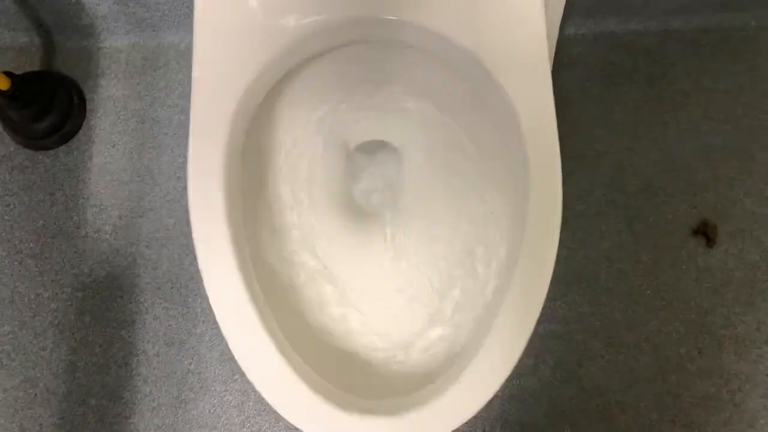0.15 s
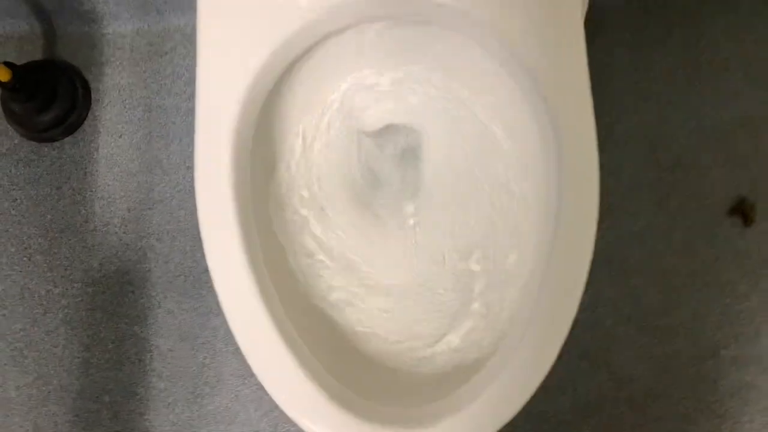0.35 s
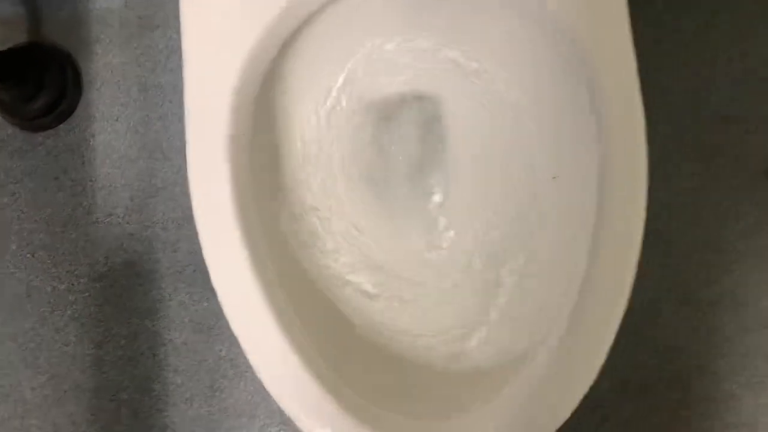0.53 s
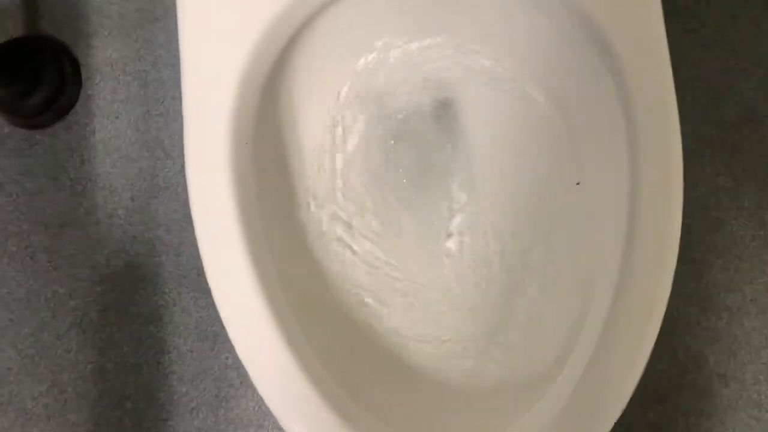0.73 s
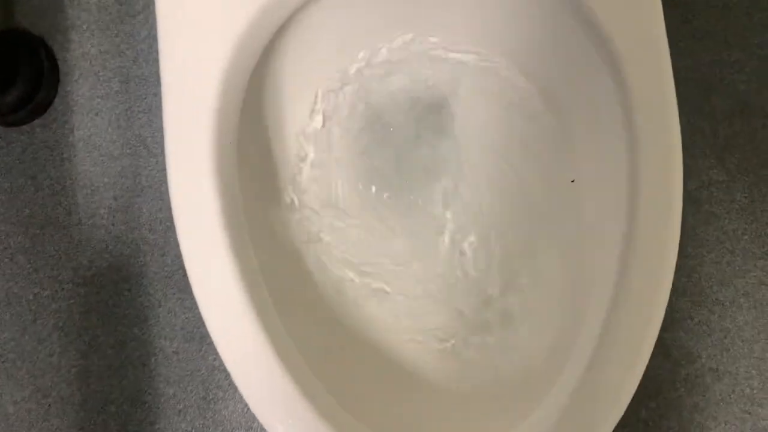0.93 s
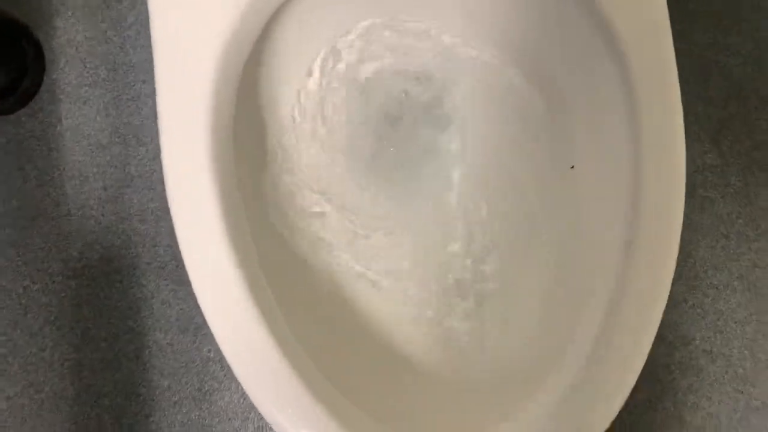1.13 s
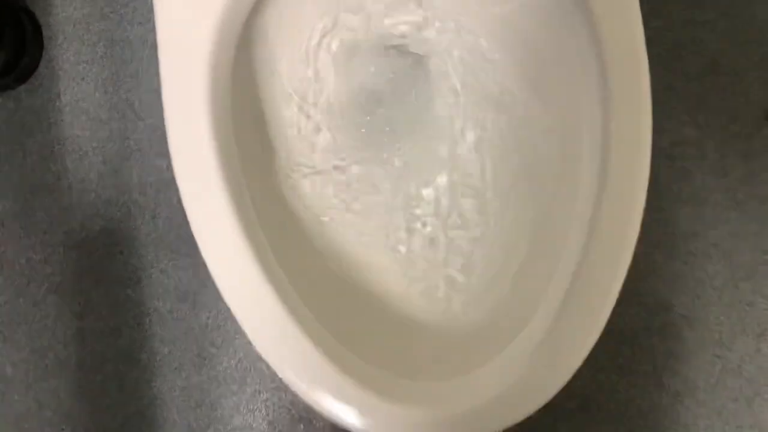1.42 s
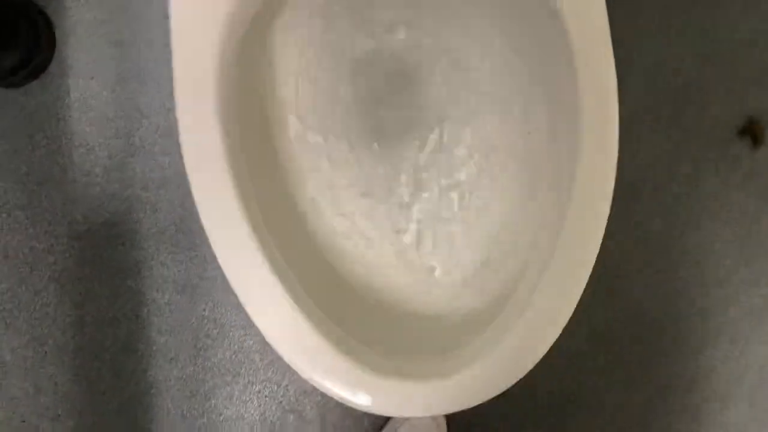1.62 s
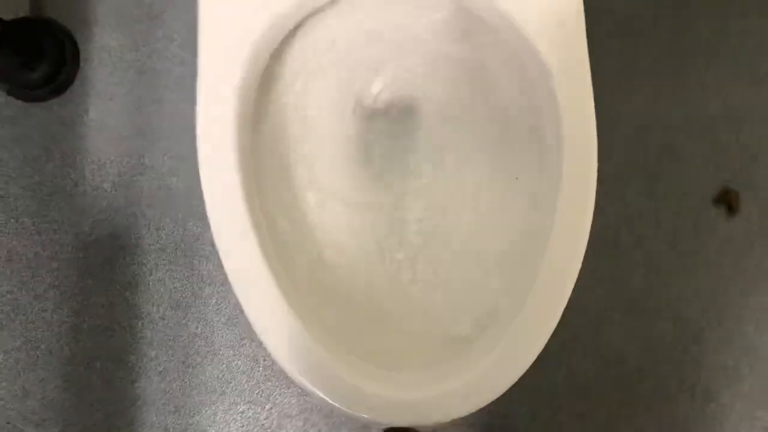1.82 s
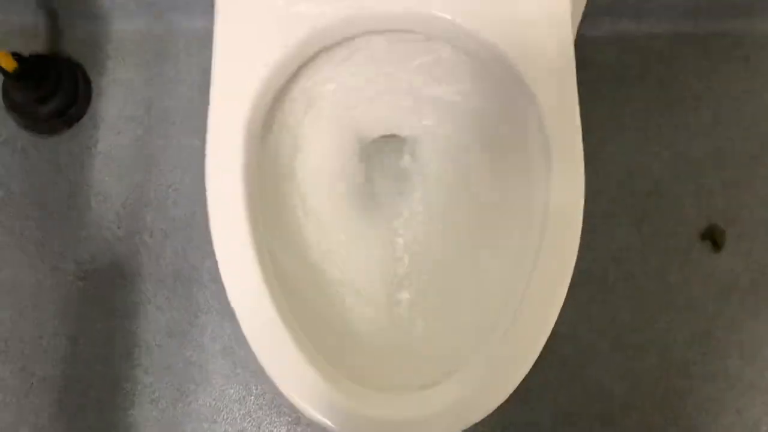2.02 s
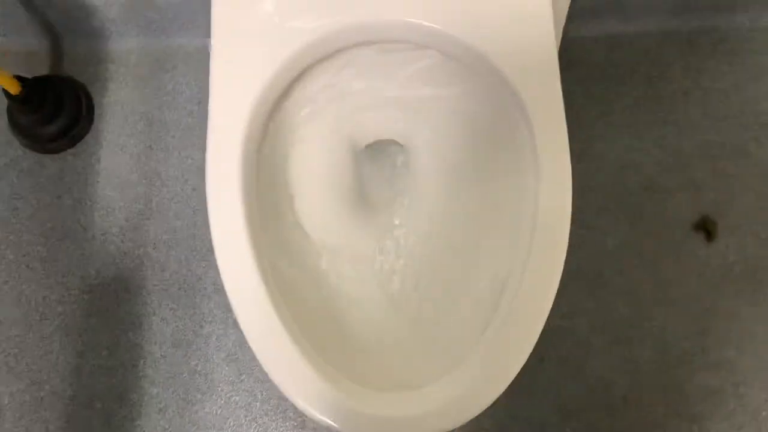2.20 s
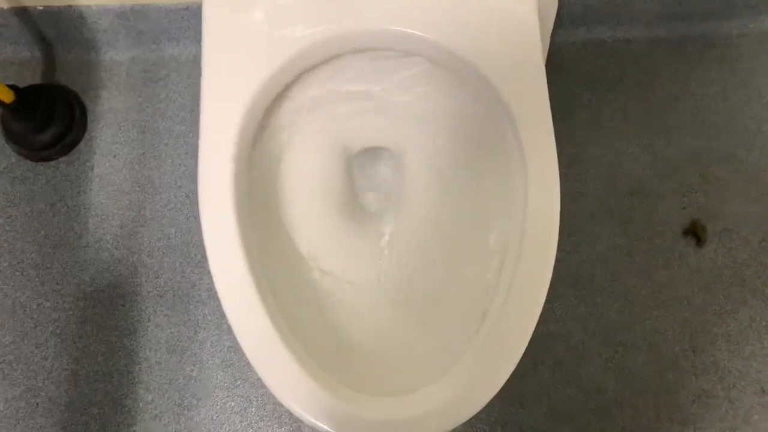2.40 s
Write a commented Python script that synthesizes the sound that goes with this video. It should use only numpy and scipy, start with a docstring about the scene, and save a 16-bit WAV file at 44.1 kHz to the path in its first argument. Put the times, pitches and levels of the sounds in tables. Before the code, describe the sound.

A toilet flushes in a small tiled room, close above the bowl: gurgling bubbles fade into thin valve hiss, two sharp plastic clacks with handling rumble, then louder glugging with swelling water and spray.

```python
"""A toilet flushes in a small tiled room, heard from a hand-held two-port microphone above the bowl.
First air gurgles through the trap as swarming bubbles and single glugs, over noise beds of rim water and spray.
A valve hiss, noise with faint whistling bands, comes in as the gurgle dies away. In the lull fall two sharp
plastic clacks, cracks with ringing parts, probably the flush lever or valve; the hand rumbles on the microphone.
Then the gurgle returns louder, with water and spray swelling to the end."""
import sys
import numpy as np
from scipy import signal
from scipy.fft import rfft, irfft
from scipy.io import wavfile
from scipy.ndimage import uniform_filter1d

SR = 44100
rng = np.random.default_rng(int(sys.argv[2]) if len(sys.argv) > 2 else 0)


def level_to_linear(level):
    """Convert decibel levels to linear amplitude factors, elementwise."""
    exponent = np.asarray(level, float) / 20
    return 10 ** exponent


def bounce(signal):
    """Save signal as a 16-bit WAV file at the path given by the first command-line argument."""
    frames = np.transpose(np.atleast_2d(signal))
    limited = np.clip(frames, -1, 1)
    pcm = np.round(limited * 32767).astype(np.int16)
    wavfile.write(sys.argv[1], SR, pcm)


N = 112454   # samples


def rms_one(x):
    """Scale to rms 1."""
    return x / np.sqrt(np.mean(x ** 2) + 1e-20)


def in_time(rows):
    """Gain at every sample from (t/s, level/dB) rows."""
    return level_to_linear(np.interp(np.arange(N) / SR, *np.transpose(rows)))


def at_hz(points, hz):
    """Read a table on a log-frequency axis."""
    table_hz, values = np.transpose(points)
    return np.interp(np.log(np.maximum(hz, 1)), np.log(table_hz), values)


def coloured(x, colour):
    """Filter by an (f/Hz, level/dB) table."""
    hz = np.arange(N // 2 + 1) * SR / N
    return irfft(rfft(x) * level_to_linear(at_hz(colour, hz)), N)


def drift(rate_hz):
    """Slow random wander of rms 1: noise through a two-pole low-pass, drawn every 40 samples."""
    pole = np.exp(-2 * np.pi * rate_hz * 40 / SR)
    noise = rng.standard_normal(N // 40 + 2002)
    slow = signal.lfilter([1], [1, -2 * pole, pole * pole], noise)[2000:]   # skip the run-in
    return np.interp(np.arange(N) / 40, np.arange(len(slow)), rms_one(slow))


# How alike left and right are in the noise beds: f/Hz, correlation (-1 to 1)
LEFT_RIGHT_LIKENESS = [(60, 0.86), (290, 0.93), (640, -0.064), (1410, -0.063), (3100, 0.064), (5400, -0.16),
                       (6500, 0.38)]


def wash(colour, patchy_db, source=None, peaks=()):
    """Stereo noise in half-octave bands, each flickering on its own and together; rms 1."""
    hz = np.arange(N // 2 + 1) * SR / N
    alike = np.clip(at_hz(LEFT_RIGHT_LIKENESS, hz), -1, 1)
    mid, side = rfft(rng.standard_normal((2, N)) if source is None else source)
    stereo = np.sqrt(1 + alike) * mid + np.sqrt(1 - alike) * side * [[1], [-1]]
    inside = (hz > colour[0][0]) & (hz < colour[-1][0])
    db = at_hz(colour, hz)
    for centre_hz, width_hz, change_db in peaks:
        db = db + change_db * np.exp(-((hz - centre_hz) / width_hz) ** 2)
    spectrum = level_to_linear(db) * inside * stereo
    out, together = 0, drift(34.0)
    place = 2 * np.log2(np.maximum(hz, 1))   # half-octaves above 1 Hz
    for k in range(int(place[inside][0]), int(place[inside][-1]) + 2):
        band = irfft(spectrum * np.clip(1 - abs(place - k), 0, 1), N)
        out = out + band * level_to_linear(patchy_db * (0.25 * together + drift(42.0)))
    return rms_one(out)


GLUG_RISE = 0.0067   # pitch rise per cycle, as a share of the pitch


def bubbles(s, db, hz, cycles):
    """Each air pocket swells to its peak over some cycles, rings at a rising pitch and dies."""
    t = np.arange(1400) / SR
    turns = np.asarray(hz)[:, None] * t
    swell = (turns / cycles * np.exp(1 - turns / cycles)) ** 2
    ring = np.sin(2 * np.pi * turns * (1 + GLUG_RISE * (turns / 2 - cycles)))   # named pitch at the peak
    places = (np.asarray(s)[:, None] * SR).astype(int) + np.arange(len(t))
    out = np.zeros(N + len(t))
    np.add.at(out, places, swell * ring * level_to_linear(np.asarray(db))[:, None])
    return out[:N]


# Bubble swarm in the trap: t/s, level/dB, brightness/(dB per octave)
SWARM = [(0, -26.5, 2), (.24, -26.5, -2), (.42, -30, -3.5), (.5, -34, -5.5), (.65, -38, -7), (.96, -44, -7),
         (1.1, -53, -19), (1.25, -43, -27), (1.6, -37, 4), (1.69, -29.5, 1.5), (1.8, -27, 2.5),
         (1.9, -19.5, 0.5), (1.94, -25, 4.5), (2.0, -18.5, 0), (2.13, -20, 4), (2.179, -22, 4),
         (2.27, -18.5, 1), (2.4, -21, 3.5), (2.55, -20, -1.5)]
# Resonances of bowl and trap: f/Hz, level/(dB per Hz)
BOWL_RESONANCES = [(200, -3.5), (275, -3.5), (356, 1.5), (470, -0.5), (600, 2), (720, 5.5), (850, -5),
                   (980, -8), (1130, -3), (1330, -12), (1500, -13), (1700, -22), (3000, -35), (6600, -120)]
BUBBLES_PER_S, BUBBLE_SPREAD_DB = 1300, 2
BUBBLE_MID_HZ, BUBBLE_MID_CYCLES = 603, 3.27   # cycles to the peak at the middle pitch


def bubble_swarm():
    """A dense crowd of random bubbles ringing through the bowl's resonances."""
    start, pitch, luck = rng.random((int(BUBBLES_PER_S * N / SR), 3)).T
    s, hz = start * N / SR, 270 * 10.57 ** pitch
    at, level_db, brightness = np.transpose(SWARM)
    db = np.interp(s, at, brightness) * np.log2(hz / BUBBLE_MID_HZ) + 25 * np.log10(hz)
    db = db - BUBBLE_SPREAD_DB * np.log(luck + 0.019)
    cycles = BUBBLE_MID_CYCLES * (hz / BUBBLE_MID_HZ) ** 0.41
    swarm = bubbles(s, db, hz, cycles[:, None]) * level_to_linear(drift(32.0))   # trembles by 1 dB
    swarm = coloured(swarm, BOWL_RESONANCES)
    swarm = swarm / np.sqrt(uniform_filter1d(swarm ** 2, size=6000) + 1e-20)   # even out before the level curve
    return in_time(np.transpose([at, level_db])) * swarm


# Loudest single glugs: t/s, peak level/dB before GLUG_LIFT_DB, f/Hz
LOUD_GLUGS = [(0.054, -12.5, 705), (0.069, -16.5, 630), (0.092, -23, 690), (0.19, -15, 680),
              (0.193, -20, 361), (0.229, -20, 766), (0.267, -11.5, 703), (0.331, -17.5, 664),
              (0.352, -29, 610), (0.367, -15, 620), (0.381, -12.5, 643), (0.524, -17, 710),
              (0.559, -16, 650), (0.606, -25, 406), (1.621, -18.5, 636), (1.638, -18.5, 590),
              (1.689, -16, 626), (1.699, -12.5, 640), (1.706, -10, 664), (1.721, -11, 682),
              (1.761, -13, 640), (1.799, -12, 638), (1.821, -9, 770), (1.847, -3.5, 702),
              (1.861, -5.5, 690), (1.885, -10, 663), (1.899, -15.5, 466), (1.919, -12, 762),
              (1.954, -3.5, 684), (1.978, -8, 720), (1.988, -7, 797), (2.008, -5.5, 766), (2.035, -7, 636),
              (2.049, -16, 602), (2.091, -10.5, 653), (2.105, -9, 747), (2.133, -7.5, 610),
              (2.229, -11, 628), (2.2345, -9.5, 458), (2.324, -4.5, 686), (2.354, -3.5, 730),
              (2.462, -13, 690)]
# Glugs ring longest while the trap refills: t/s, cycles to the peak
GLUG_LENGTHS = [(.4, 1.72), (1.7, 2.26), (2.0, 2.76), (2.1, 1.46)]
# Loud small bubbles: t/s, peak level/dB, f/Hz
SMALL_BLIPS = [(0.215, -25, 1156), (0.261, -19, 1166), (1.571, -25, 1270), (1.625, -24.5, 2230),
               (1.809, -27, 1270), (1.91, -11, 1144), (1.957, -11.5, 1180), (2.279, -16, 1093),
               (2.335, -16, 1470), (2.343, -19, 2360)]
GLUG_LIFT_DB, BLIP_CYCLES = 0.5, 4.6   # blip cycles to the peak


def gurgle():
    """Air forced through the trap: the bubble swarm under loud single glugs and blips."""
    s, db, hz = np.transpose(LOUD_GLUGS)
    cycles = np.interp(s, *np.transpose(GLUG_LENGTHS))
    glugs = bubbles(s, db + GLUG_LIFT_DB, hz, cycles[:, None])
    blips = bubbles(*np.transpose(SMALL_BLIPS), BLIP_CYCLES)
    return bubble_swarm() + glugs + blips


# Blows, the last two close enough to fuse: t/s, level/dB before a trim, lowest f/Hz, brightness/(dB per octave)
BLOWS = [(1.115, 0.5, 920, -0.5), (1.2302, -6, 400, -0.5), (1.2339, -6.5, 286, -1.5)]
# Ringing plastic parts: f/Hz, level/dB before random spread, t60/s
PLASTIC_MODES = [(351, -8.5, 0.073), (517, -12.5, 0.037), (1470, -10.5, 0.018), (2090, -8.5, 0.035),
                 (2370, -11, 0.02), (2740, -9.5, 0.014), (3720, -7.5, 0.017), (4000, -10, 0.015),
                 (10220, -5, 0.018)]
# Spectrum of the crack before each blow's brightness: f/Hz, level/(dB per Hz)
CRACK_SPECTRUM = [(700, -4), (1400, -3), (2300, 3), (3250, -9), (3900, -3.5), (6000, -3), (7700, 2.5),
                  (9000, -6), (10600, 3), (14500, 3.5), (17000, -24)]
CRACK_T60_S, CRACK_DB = 0.029, 2.5


def clacks():
    """Each blow is a short noise crack plus the ringing of the plastic parts."""
    t, out = np.arange(N) / SR, np.zeros(N)
    for s, db, low_hz, brightness in BLOWS:
        age = np.maximum(t - s, 0)
        colour = [(hz, level + brightness * np.log2(hz / 1000)) for hz, level in CRACK_SPECTRUM]
        crack = rms_one(coloured(rng.standard_normal(N), colour))
        hit = crack * (t > s) * level_to_linear(CRACK_DB - 60 * age / CRACK_T60_S)
        spread_db = rng.normal(0, 1.44, len(PLASTIC_MODES))
        for (hz, mode_db, t60), luck in zip(PLASTIC_MODES, spread_db):
            hit += np.sin(2 * np.pi * hz * age) * level_to_linear(mode_db + luck - 60 * age / t60)
        high_pass = signal.butter(2, low_hz, "high", fs=SR, output="sos")
        out += level_to_linear(db - 8.5) * signal.sosfilt(high_pass, hit)
    return out


# Water round the rim: t/s, level/dB before RUSH_LIFT_DB
RUSH_LEVEL = [(0.0, -43), (0.2, -42.5), (0.32, -46.5), (0.55, -44), (0.94, -50), (1.16, -45.5),
              (1.28, -35.5), (1.62, -38.5), (2.14, -38.5), (2.55, -30)]
# Its spectrum: f/Hz, level/(dB per Hz)
RUSH_SPECTRUM = [(88, -17), (150, -6.5), (242, -26), (296, -8.5), (415, 3.5), (490, -19), (770, -2.5),
                 (7000, -15.5), (13200, -120)]
RUSH_LIFT_DB = 6


def rush():
    """Turbulent rim water: patchy noise following a level curve."""
    return level_to_linear(RUSH_LIFT_DB) * in_time(RUSH_LEVEL) * wash(RUSH_SPECTRUM, patchy_db=2.0)


# Valve hiss: t/s, level/dB
HISS_LEVEL = [(0, -55), (.32, -70), (.345, -34.5), (.75, -33), (.94, -33.5), (.97, -37.5), (1.2, -32.5),
              (1.45, -38), (2.55, -50)]
# Its spectrum: f/Hz, level/(dB per Hz)
HISS_SPECTRUM = [(2200, -12.5), (2800, -5), (4000, -2), (6000, -4), (8000, -0.5), (10000, -6.5),
                 (13000, -5), (15800, -5)]
# Faint whistles of the valve: f/Hz, width/Hz, level over the hiss/dB
VALVE_WHISTLES = [(4500, 80, 5), (4930, 80, 5), (6860, 90, 8), (10750, 100, 4)]


def valve_hiss():
    """Water squeezed through the valve: nearly even noise with narrow whistling bands."""
    return in_time(HISS_LEVEL) * wash(HISS_SPECTRUM, patchy_db=0.5, peaks=VALVE_WHISTLES)


# Fine spray: t/s, level/dB
SPRAY_LEVEL = [(0, -38), (.155, -40), (.165, -34.5), (.23, -43.5), (.33, -42.5), (.5, -39), (1.3, -44),
               (1.5, -30.5), (1.85, -28.5), (2.3, -32), (2.45, -27.5), (2.55, -24)]
# Its spectrum: f/Hz, level/(dB per Hz)
SPRAY_SPECTRUM = [(2500, -2.5), (4000, 1), (5500, -4.5), (7500, 3), (10000, 5.5), (13000, 4.5), (15500, 5),
                  (16500, -28)]
# Single droplet ticks: t/s, level/dB of the burst before its band-pass, f/Hz
DROPLET_TICKS = [(0.162, -17.5, 8900), (1.839, -12.5, 8900), (2.203, -16, 11900)]
DROPS_PER_S, DROP_SPREAD_DB, TICK_T60_S = 6000, 2, 0.042


def spray():
    """Thousands of tiny droplets bursting as random impulses, and a few single ticks of banded noise."""
    sizes = level_to_linear(DROP_SPREAD_DB * np.minimum(rng.exponential(1, (2, N)), 5))
    signs = rng.choice([-1, 1], (2, N))
    drops = sizes * signs * (rng.random((2, N)) < DROPS_PER_S / SR)
    fizz = in_time(SPRAY_LEVEL) * wash(SPRAY_SPECTRUM, patchy_db=1.5, source=drops)
    t = np.arange(N) / SR
    for s, db, hz in DROPLET_TICKS:
        decay = level_to_linear(db - 60 * np.maximum(t - s, 0) / TICK_T60_S)
        burst = rng.standard_normal(N) * (t > s) * decay
        band = signal.butter(2, [hz / 1.16, hz * 1.13], "band", fs=SR, output="sos")
        fizz = fizz + signal.sosfilt(band, burst)
    return fizz


# Hand rumble: t/s, level/dB
RUMBLE_LEVEL = [(0, -47), (.64, -54.5), (1.04, -50), (1.2, -39), (1.3, -35), (1.55, -46), (1.62, -47),
                (2.3, -50.5), (2.55, -49)]
# Its spectrum: f/Hz, level/(dB per Hz)
RUMBLE_SPECTRUM = [(13, -40), (22, -8), (70, 1.5), (130, -0.5), (178, -10.5), (220, -4), (290, -55),
                   (480, -120)]
# One low hum near 217 Hz and two slight dips: f/Hz, width/Hz, level against the rumble/dB
HUM_AND_DIPS = [(70, 18, -1), (130, 11, -1), (217, 8.4, 8.5)]


def hand_rumble():
    """The hand on the microphone: patchy low noise with one narrow hum."""
    return in_time(RUMBLE_LEVEL) * wash(RUMBLE_SPECTRUM, patchy_db=2.0, peaks=HUM_AND_DIPS)


# Air murmuring in the trap: f/Hz, level/(dB per Hz)
MURMUR_SPECTRUM = [(310, -28), (356, 9), (450, -27)]
MURMUR_DB, MURMUR_FOLLOWS = -21.5, 0.57   # offset added to this share of the rumble's dB curve


def trap_murmur():
    """Air in the trap, shaken up with the rumble: a narrow noise band following part of its swing."""
    gain = level_to_linear(MURMUR_DB) * in_time(RUMBLE_LEVEL) ** MURMUR_FOLLOWS
    return gain * wash(MURMUR_SPECTRUM, patchy_db=3.0)


ROOM_T60_S, ROOM_HIGH_T60_S, ROOM_SPLIT_HZ, ROOM_GAP_S = 0.27, 0.051, 7400, 0.0015


def room(x):
    """Tiled walls: a dying noise response per channel, treble dying first."""
    t = np.arange(SR // 2) / SR
    white = rng.standard_normal((2, len(t))) * (t > ROOM_GAP_S)
    low = signal.sosfilt(signal.butter(2, ROOM_SPLIT_HZ, fs=SR, output="sos"), white)
    tail = low * level_to_linear(-60 * t / ROOM_T60_S) + (white - low) * level_to_linear(-60 * t / ROOM_HIGH_T60_S)
    response = rms_one(tail) / np.sqrt(len(t))
    return signal.fftconvolve(x[None], response, axes=1)[:, :N]


BOWL_WET_DB, CLACK_WET_DB = -7.5, 1.5   # sends to the room
BOWL_PAN_DB, RIGHT_LATE_S = 1.27, 0.00007   # left port up and right port down; right port later


def scene():
    """All sources at the two ports."""
    trap, blows = gurgle(), clacks()
    late_trap = np.interp(np.arange(N) - RIGHT_LATE_S * SR, np.arange(N), trap)
    direct = np.array([trap * level_to_linear(BOWL_PAN_DB), late_trap * level_to_linear(-BOWL_PAN_DB)]) + blows
    echoes = room(level_to_linear(BOWL_WET_DB) * trap + level_to_linear(CLACK_WET_DB) * blows)
    return direct + echoes + rush() + valve_hiss() + spray() + hand_rumble() + trap_murmur()


def low_pass(x):
    """Removes everything above the highest recorded frequency."""
    return signal.sosfilt(signal.butter(12, 17090, fs=SR, output="sos"), x)


JOIN_HZ, JOIN_WIDTH_HZ = 6600, 800   # the right channel crosses over to the left's signal here
TURN_HZ, IN_STEP_HZ = 5050, 11000   # its phase runs ahead a full turn every TURN_HZ, in step at IN_STEP_HZ
LINGER = 0.07   # how far the phase lingers near in-step and opposite
TOP_HZ, TOP_WIDTH_HZ, ABOVE_TOP_DB = 15400, 150, -38   # top shelf


def record(dry):
    """The top is shelved, the treble is one signal with a turning phase between channels, overloads clip."""
    hz = np.arange(N // 2 + 1) * SR / N
    shelf = level_to_linear(ABOVE_TOP_DB * np.clip((hz - TOP_HZ) / TOP_WIDTH_HZ, 0, 1))
    left, right = rfft(dry) * shelf
    turn = 2 * np.pi * (hz - IN_STEP_HZ) / TURN_HZ
    turned_left = left * np.exp(1j * (turn - LINGER / 2 * np.sin(2 * turn)))
    share = np.clip((hz - JOIN_HZ) / JOIN_WIDTH_HZ + 0.5, 0, 1)
    right = np.sqrt(1 - share) * right + np.sqrt(share) * turned_left
    mix = 0.99 * np.clip(irfft(np.array([left, right]), N), -1, 1)
    return low_pass(mix)


dry = scene()
out = record(dry)
bounce(out)
```